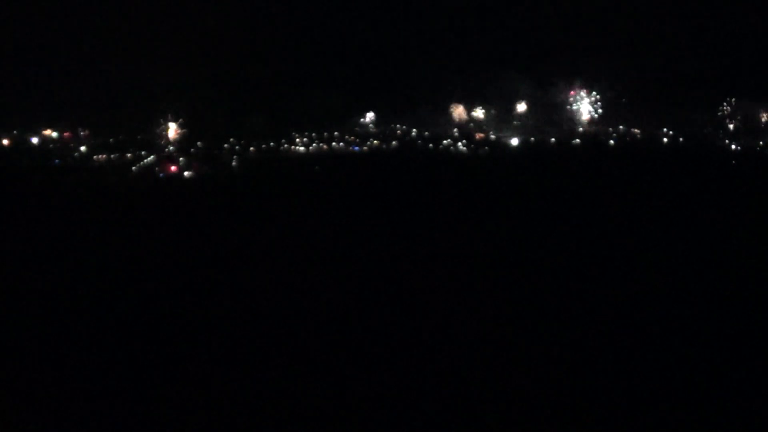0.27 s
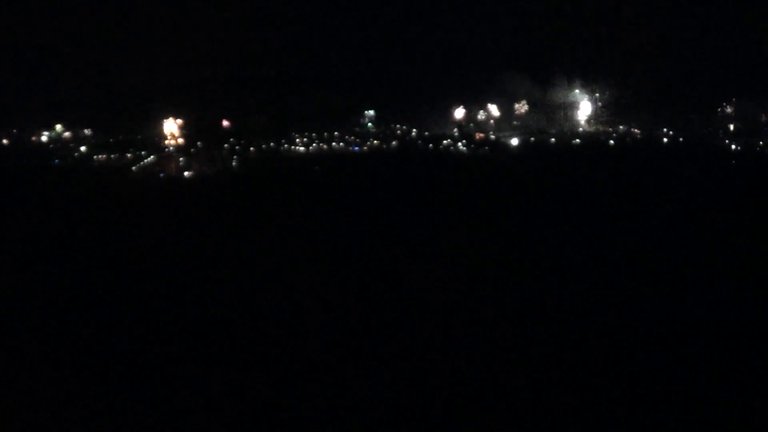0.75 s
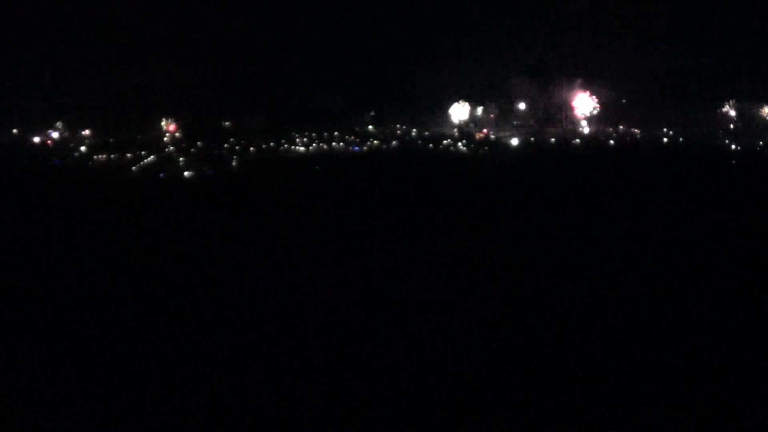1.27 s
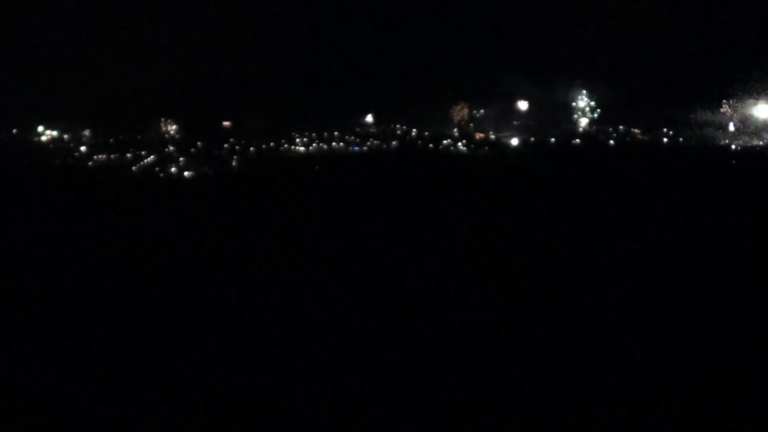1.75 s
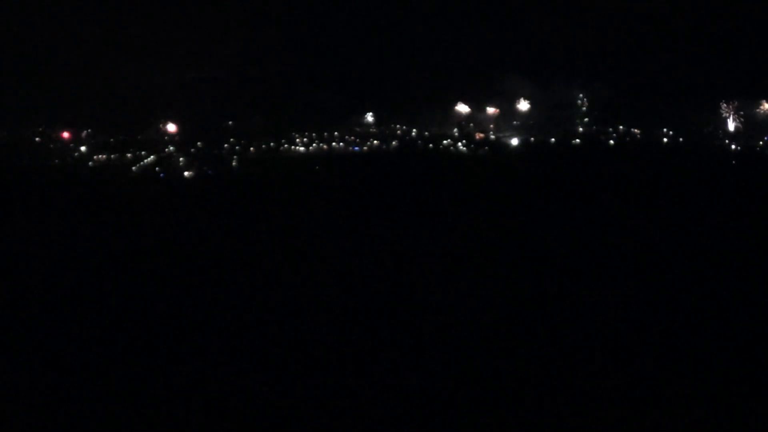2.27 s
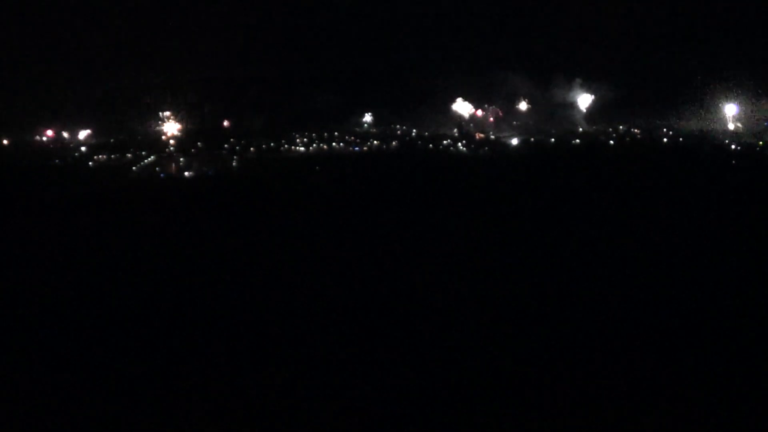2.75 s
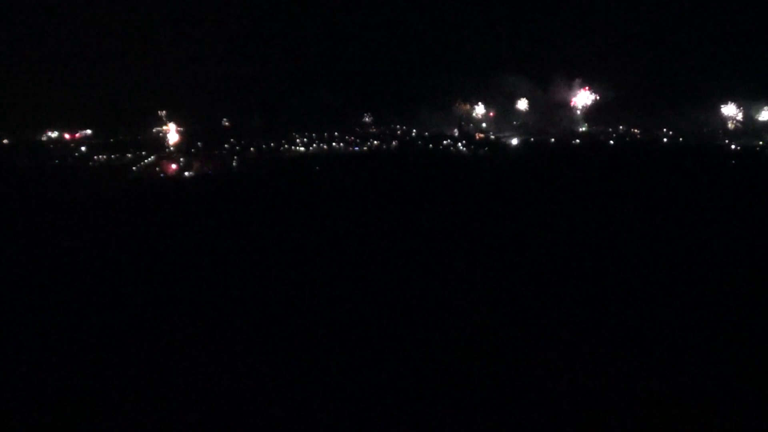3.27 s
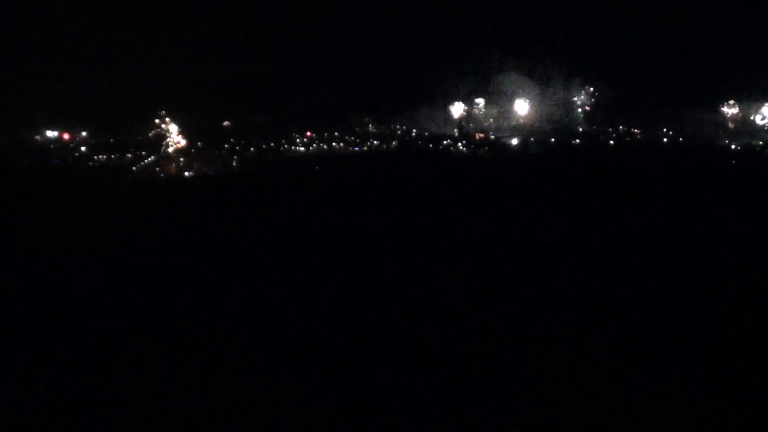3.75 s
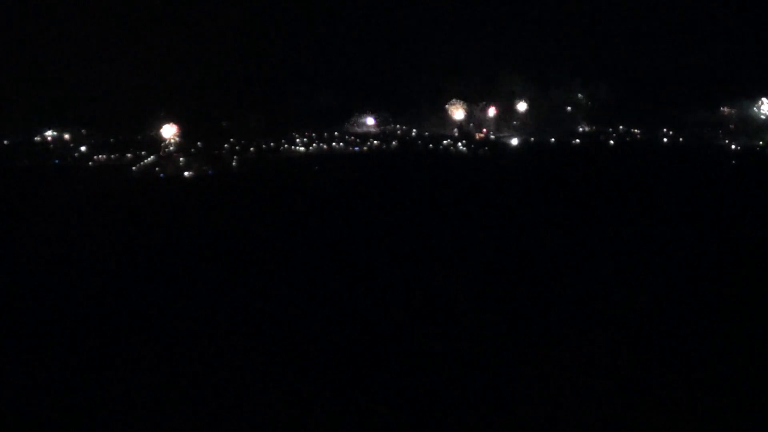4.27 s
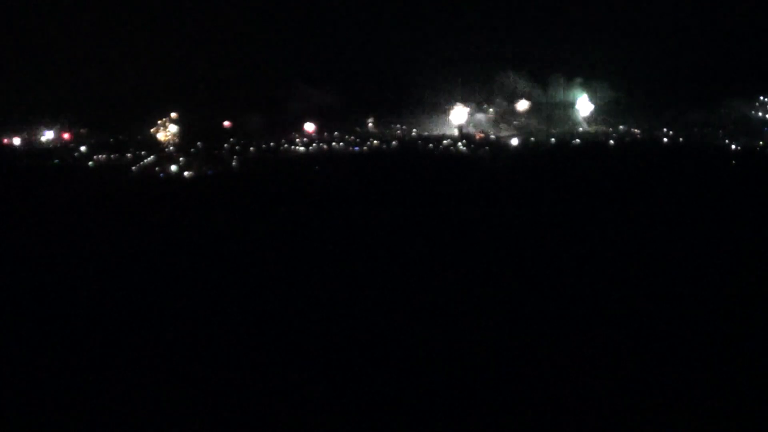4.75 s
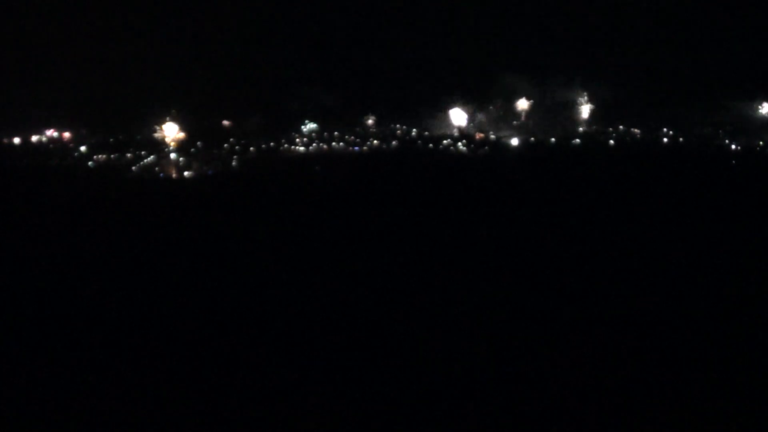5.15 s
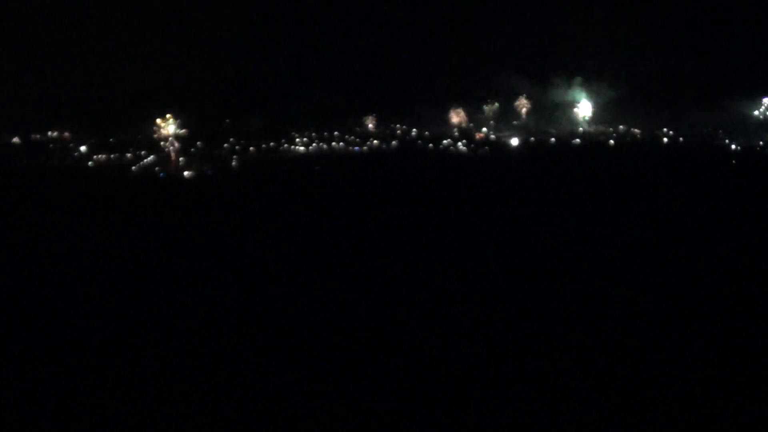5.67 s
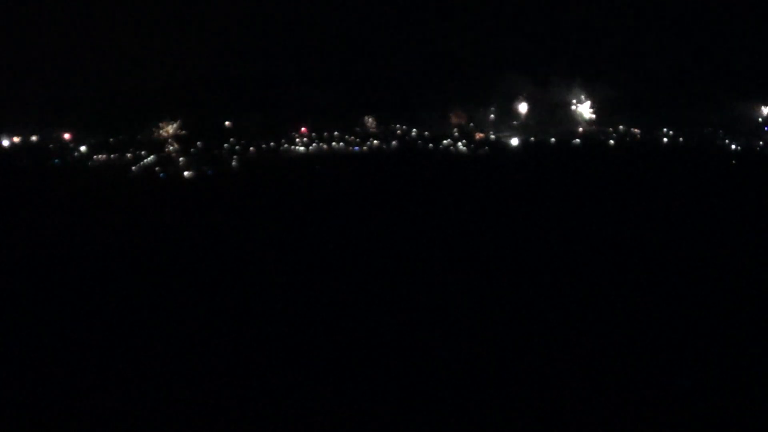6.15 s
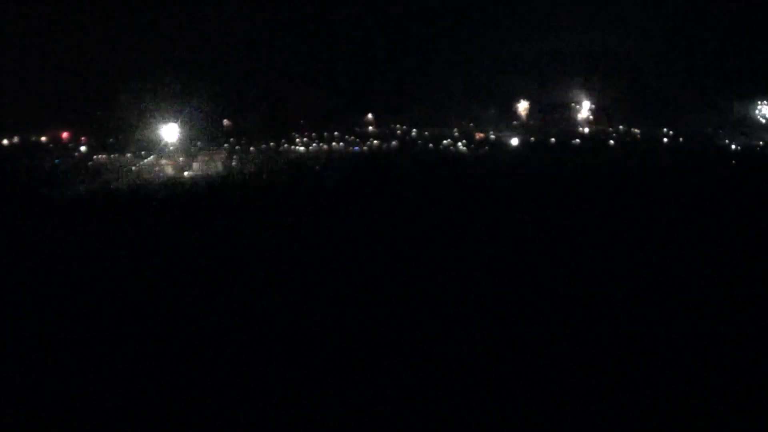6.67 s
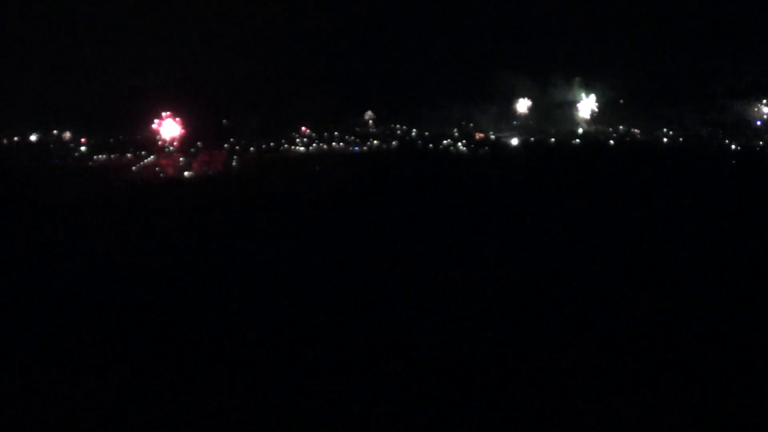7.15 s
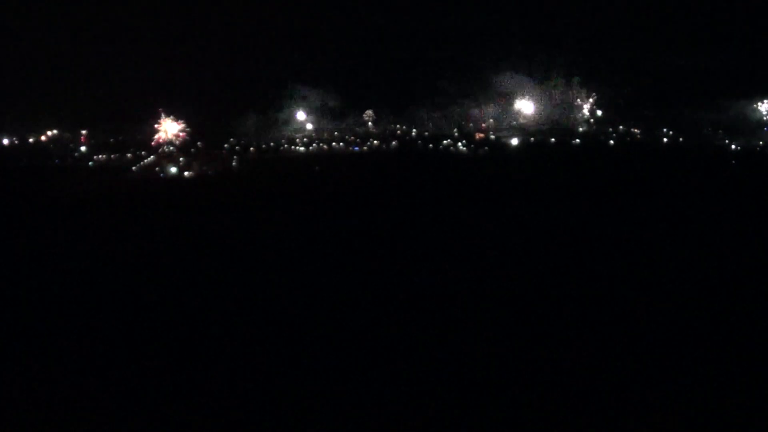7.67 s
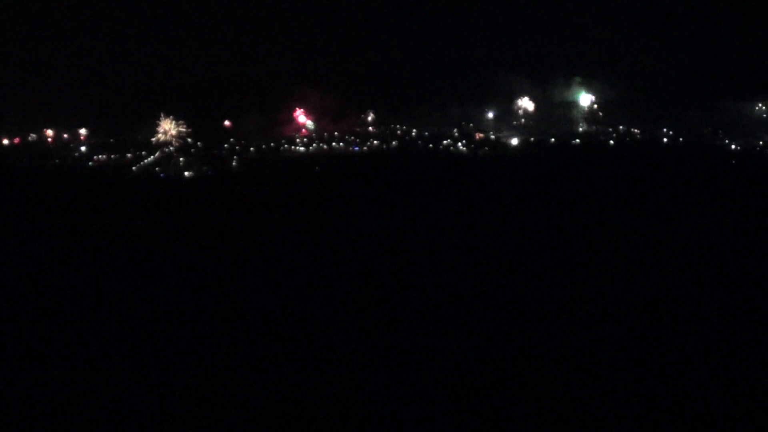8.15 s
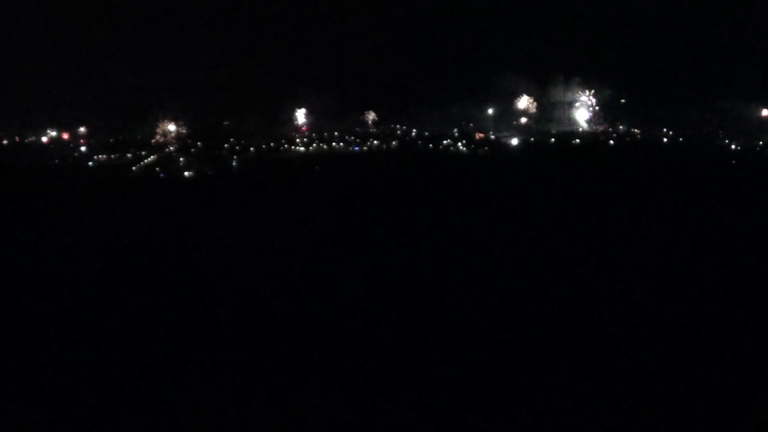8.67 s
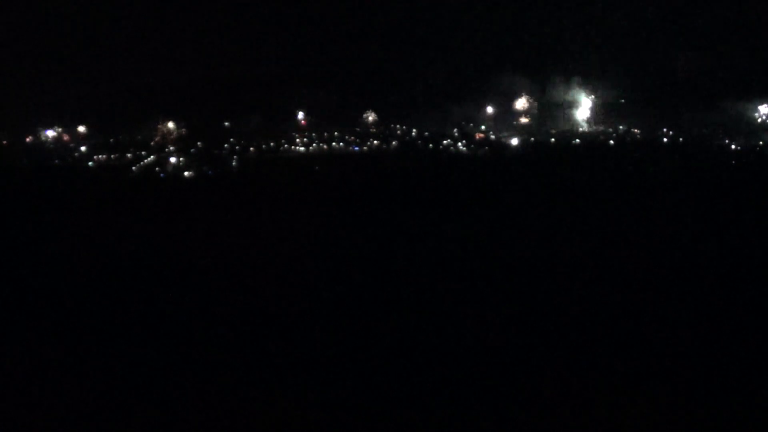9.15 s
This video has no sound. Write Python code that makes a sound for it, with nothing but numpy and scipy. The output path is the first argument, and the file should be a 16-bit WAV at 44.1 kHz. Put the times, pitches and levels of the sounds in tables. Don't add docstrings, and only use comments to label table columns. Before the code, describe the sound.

Dozens of far-off fireworks bursting at once, rapid bangs and snaps piling up over a continuous patter and sizzling crackle outdoors.

```python
import sys
import numpy as np
from scipy import signal
from scipy.fft import rfft, irfft, next_fast_len
from scipy.io import wavfile
from scipy.ndimage import uniform_filter1d

SR = 44100
rng = np.random.default_rng(int(sys.argv[2]) if len(sys.argv) > 2 else 0)


def bounce(signal):
    frames = np.transpose(np.atleast_2d(signal))
    limited = np.clip(frames, -1, 1)
    pcm = np.round(limited * 32767).astype(np.int16)
    wavfile.write(sys.argv[1], SR, pcm)


def volts_from_decibels(level):
    exponent = np.asarray(level, float) / 20
    return 10 ** exponent


N = 414981

# start in seconds, thump level in dB, starting
# pitch in Hz, then crack level in dB if one survives the distance, and its extra steepness in dB.
LEFT_SHELLS = [(.15, 0, 525, -10, -.4), (0.2649, -2, 620, -23, 1.5), (.769, -3, 560, -22),
               (1.1086, -6.5, 427), (0.5521, -4, 529), (1.2652, -5, 470), (1.56, -6.8, 510),
               (1.693, -4.8, 520), (2.3748, 6, 500, -6, -.4), (2.4459, -6, 510), (2.736, -2.5, 470, -24),
               (3.8329, -6.5, 530), (4.1119, -7, 510), (4.4155, -9, 555), (4.7128, -2, 313),
               (5.0264, -8, 423), (5.2297, 2, 477, -4, .4), (6.6806, -4.5, 590), (7.2624, -8, 535),
               (7.874, 0, 563), (8.354, -6.5, 415, -21), (8.8656, 3.5, 443, -5), (8.9053, 2.5, 470, -13.5),
               (9.0489, 2, 557), (9.099, -7, 610, -19, 1.2)]
MID_LEFT_SHELLS = [(0.1977, 1, 493, -8, -.3), (0.2834, -9, 467, -12, 0), (0.3768, 4, 640, -23),
                   (0.595, 3, 590, -15, 1), (0.6462, 2.5, 620, -20, -.5), (0.8885, 2.5, 503, -5.5, .4),
                   (1.0039, -4, 536), (1.1845, 4.5, 460, -6, -1), (1.409, 4, 332, -10, 1),
                   (1.5089, -6, 500), (1.8016, -1, 530), (1.8223, -3.5, 480), (2.6309, -6, 550, -15.5, .2),
                   (3.135, 4, 494, -11, -1), (3.5498, -10, 393), (3.608, -5.5, 425),
                   (3.6569, -6, 570, -18, .3), (3.6704, -6, 493), (4.1712, -8, 480), (4.3548, 2.5, 536, -5),
                   (4.395, -2, 543, -19, .7), (6.1034, 4.5, 543, -10.5), (6.2026, 2.5, 503, -7.5),
                   (7.024, -0.5, 550, -5, -.7), (7.3325, -5, 325, -14, -3), (7.646, -2.5, 355, -16),
                   (7.8879, 1, 395, -13), (7.9739, -5, 610, -16.5), (8.695, -5.5, 340, -22),
                   (9.162, 1.5, 454, -7, .7)]
MID_RIGHT_SHELLS = [(.054, -6, 520, -17, 1), (0.3466, 2, 570, -18, 1), (0.7126, 1, 603),
                    (0.9386, 3, 496, -11), (1.4245, -4.5, 335), (6.1732, -4, 627, -21, .7),
                    (2.041, -3.5, 503, -15), (2.3465, -8, 463), (2.6533, 1.5, 450, -11, -.4),
                    (2.7988, -4, 555, -23, 1.5), (2.822, -5, 630, -34), (3.215, 1, 556, -17, 1.2),
                    (4.0906, 0, 650, -26), (4.2013, 2, 410, -7, 0), (4.3225, -4, 575, -13, .5),
                    (4.5942, 5.5, 500, -19), (5.315, -5.5, 447), (5.3578, 4, 617, -15),
                    (5.654, 3, 420, -9.5), (6.065, 2, 374, -3), (6.6497, -3, 450, -12),
                    (7.0184, 5, 458, -14.5), (7.1342, 1.5, 650, -18.5), (7.3506, 2.5, 660, -14, -1),
                    (7.3887, 5, 620), (7.7536, -9, 600, -17, .5), (7.803, -5.5, 550, -21),
                    (8.2759, 1.5, 455, -14.5), (8.909, -0.5, 443, -0.5), (9.016, 3, 487, -8, .8),
                    (9.342, 1, 424, -11, -.6)]
RIGHT_SHELLS = [(0.03, -9.5, 560), (.1651, -3, 610, -10.5), (0.2145, -3, 660, -14.5), (.273, -7, 485),
                (0.3008, -2, 560, -14), (.7858, -7, 645, -15), (1.3662, -2.5, 650, -14, 1.6),
                (1.63, 2, 410, -9.5), (6.4731, -3, 590, -9), (2.279, -4.5, 546, -10, .2),
                (2.353, -6, 505, -19.5), (2.92, 5, 392, -8, -1.5), (3.9515, -7.5, 517), (3.9553, -4, 475),
                (4.226, 3.5, 430, -7), (4.7255, 1, 590, -11, -.8), (5.1051, -3.5, 510, -11.5, -.7),
                (5.7319, -3, 570, -11.5), (6.4817, -7, 322, -16), (6.672, -1, 474, -9, -.4),
                (6.8589, -5.5, 516, -13.5), (7.6726, 0, 605, -9.5), (7.9684, -9, 530), (9.045, 4, 440, -13)]
NEAR_SALUTES = [(0.2021, -11, 582, -23), (0.3674, -6, 684, -14), (1.197, -8.5, 500, -14.5),
                (1.212, -13, 537, -22, 2), (1.597, -7, 655, -16, 1), (2.7765, -13.5, 620, -27),
                (2.9886, 1.5, 493, -8), (3.2572, -11, 710, -18), (3.5913, -5, 635, -12, -.7),
                (3.6247, -11, 575, -17), (3.9713, -13.5, 640, -18.5), (4.3348, -13, 440, -15),
                (4.5427, -4.5, 590, -9.5, -.2), (6.7412, -8.5, 510, -13), (6.7615, -12, 460, -14),
                (8.346, -9.5, 640, -14, -.8), (8.565, -12, 530, -20, 2), (8.6512, -10.5, 594, -15, 1),
                (8.7689, -2, 586, -7, -.5)]
SITE_PAN_DB = [4.5, -0.8, -1.5, -3, -3.6]
# start in seconds, peak level in dB.
LARGE_POPS = [(0.0786, -10.5), (0.211, -15), (0.4072, -11), (0.4205, -13), (0.539, -14.5), (1.2626, -12),
              (1.4143, -17), (1.665, -15), (2.7964, -9), (2.9331, -8), (3.2123, -9), (3.485, -13),
              (3.6544, -7.5), (4.2142, -13), (5.558, -14), (5.8597, -13), (5.9266, -12), (6.0793, -4.5),
              (6.4105, -13), (6.992, -8.5), (7.9473, -14), (7.963, -8), (9.2377, -16.5), (9.2667, -9)]
MEDIUM_POPS = [(.025, -7), (0.2941, -4), (0.5747, -12.5), (0.9978, -11.5), (1.2531, -10), (1.6357, -6.5),
               (1.8358, -10), (1.8423, -10), (2.521, -10.5), (2.955, -10), (3.052, -8.5), (3.4496, -9),
               (3.5534, -13), (3.8093, -11.5), (3.9209, -13.5), (4.383, -10), (4.7166, -4), (5.0705, -12.5),
               (5.3774, -9.5), (5.8812, -10.5), (6.1806, -6), (6.38, -8), (6.4137, -12), (6.6871, -8.5),
               (6.873, -11.5), (7.74, -14.5), (7.8779, -15), (8.1988, -15.5), (8.987, -10.5)]
SMALL_POPS = [(.507, -11.5), (.581, -16), (.625, -15), (1.14, -16), (5.468, -17.5), (0.772, -15),
              (1.4774, -12), (1.6423, -17), (1.7254, -14), (1.7986, -14), (1.8054, -4.5), (2.11, -17),
              (2.238, -17), (2.3493, -12), (2.476, -17), (2.6846, -14.4), (3.772, -10.5), (4.043, -14.5),
              (4.3473, -7), (5.3191, -16), (5.6365, -11.5), (5.6466, -12), (6.3574, -12.5), (6.7671, -10),
              (7.093, -11), (8.0706, -16), (8.474, -17), (8.488, -16), (8.7343, -11), (8.785, -16)]
TINY_POPS = [(0.4247, -6.5), (.571, -11), (1.007, -10.5), (1.6116, -9.5), (3.7994, -8.5), (6.0217, -10),
             (6.4846, -8), (6.7306, -8.5), (7.03, -5), (8.3584, -13), (8.4618, -13), (8.695, -7),
             (8.8989, 1.5), (8.84, -18), (9.1499, -10.5), (9.3543, -7), (9.3584, -8.5)]
POP_PITCH_HZ = [403, 510, 575, 650]
# start in seconds, peak level in dB.
FIRECRACKER_SNAPS = [(.262, -25), (0.4003, -20), (0.423, -14), (0.9113, -22), (1.014, -17), (1.467, -22),
                     (2.156, -26), (2.748, -21), (3.7995, -22), (3.8233, -26), (4.15, -28), (4.3582, -19),
                     (5.667, -19), (.431, -24), (.741, -30), (.95, -27), (1.381, -30), (2.392, -26),
                     (2.508, -28), (2.62, -27), (2.945, -28), (3.409, -30), (3.485, -25), (4.559, -27),
                     (4.715, -27), (4.776, -30), (5.045, -27), (5.542, -28), (5.549, -28), (6.09, -26),
                     (6.609, -30), (7.186, -29), (7.227, -29), (7.235, -29), (7.251, -28), (8.228, -29),
                     (8.287, -28), (9.037, -24), (5.746, -27), (6.019, -25), (6.0677, -17), (7.69, -26),
                     (8.2641, -25), (8.42, -30), (8.635, -33), (8.883, -24), (9.186, -24), (8.8176, -24)]
# middle in seconds, peak level in dB, heard pitch in Hz.
FAINT_THUMPS = [(.183, -19, 354), (.359, -18, 406), (.402, -16, 378), (.432, -15, 440), (.438, -19, 455),
                (.464, -16, 460), (.514, -18, 487), (.849, -19, 399), (1.015, -18, 533), (1.074, -22, 439),
                (1.153, -17, 388), (1.225, -16, 385), (1.232, -20, 496), (1.384, -19, 450),
                (1.468, -15, 493), (1.744, -21, 414), (2.391, -17, 442), (2.562, -19, 530),
                (2.603, -22, 401), (2.62, -18, 477), (2.648, -18, 336), (2.666, -18, 367),
                (2.789, -15, 470), (3.04, -17, 407), (3.268, -19, 548), (3.349, -19, 316),
                (3.379, -21, 420), (3.508, -18, 481), (3.712, -19, 356), (3.982, -20, 492),
                (4.239, -17, 438), (4.253, -21, 385), (4.374, -20, 403), (4.561, -17, 497),
                (4.68, -17, 501), (4.69, -17, 359), (4.777, -21, 406), (5.121, -19, 440), (5.668, -16, 325),
                (6.43, -18, 468), (6.665, -16, 450), (6.758, -18, 396), (6.808, -18, 399),
                (6.969, -17, 424), (7.057, -18, 461), (7.229, -21, 459), (7.285, -20, 508),
                (7.416, -19, 394), (7.691, -19, 458), (8.111, -20, 535), (8.365, -18, 339),
                (8.53, -23, 372), (8.663, -19, 440), (8.674, -17, 382), (8.948, -17, 447),
                (9.113, -19, 359), (9.138, -18, 412), (9.234, -20, 395)]
# middle in seconds, peak level in dB, pitch in Hz.
RINGING_PIPS = [(.056, -24, 1300), (.157, -29, 1500), (.787, -26, 1650), (2.35, -30, 1600),
                (7.334, -28, 1600), (.507, -32, 1300), (1.008, -28, 1500), (2.096, -32, 1720),
                (2.618, -32, 1550), (2.778, -28, 1700), (2.799, -29, 1700), (3.487, -30, 1460),
                (3.506, -32, 1450), (4.182, -30, 1450), (4.656, -32, 1660), (4.679, -31, 1520),
                (4.714, -30, 1450), (4.948, -33, 1580), (5.04, -30, 1540), (5.122, -30, 1450),
                (6.169, -32, 1640), (6.489, -28, 1575), (6.731, -29, 1440), (7.045, -32, 1820),
                (7.878, -31, 1365), (7.956, -34, 1455), (8.026, -34, 1540), (8.117, -31, 1530),
                (8.935, -32, 1560)]
# frequency in Hz, time to fall 60 dB in seconds.
TOWN_DECAY = [(150, 0.18), (500, 0.57), (1500, 0.5), (5000, 0.2)]
# time in seconds, level in dB.
FAR_SWELL = [
    (0, -31.5),
    (2.0, -33.5),
    (4.5, -32.5),
    (4.9, -35.5),
    (5.5, -34),
    (6.3, -33.5),
    (8.15, -33),
    (9.1, -32.5),
]
# frequency in Hz, level in dB per Hz.
STAR_SPECTRUM = [(600, -18), (900, -2), (1300, 4), (1670, 5.5), (2200, 1), (2750, -5), (3400, -19),
                 (6000, -49)]
# fullest moment in seconds, level in dB, flare-up time constant in
# seconds, burn-out time constant in seconds.
STAR_SHOWERS = [(.01, -49.5, .1, 0.24), (.75, -48.5, 0.16, 0.031), (.96, -45.5, .04, .25),
                (1.46, -51, 0.067, 0.15), (2.11, -46, 0.086, 0.14), (2.48, -48, .08, 0.14),
                (2.75, -46.5, 0.16, 0.1), (2.98, -49.5, 0.072, 0.072), (3.47, -43.5, 0.086, .07),
                (3.78, -48, 0.19, 0.11), (4.72, -42.5, 0.16, 0.079), (5.05, -47.5, 0.28, .06),
                (5.32, -46.5, 0.082, 0.28), (6.14, -46, .1, 0.27), (7.08, -49, .15, .15),
                (7.5, -47.5, .12, .3), (8.12, -48.5, 0.11, 0.13), (8.92, -47, 0.1, 0.26),
                (9.2, -44, 0.29, .3)]
SHOWER_TREBLE_DB = [2, 0, 3, 2, 1, 3, 1, 1, -1, 0, -1, -2, 1, 3, 5, 2, 1, 0, 5]
# frequency in Hz, gain in dB.
AIR_PATH = [(3000, 0.5), (5000, 1.5), (7000, -11), (16000, -62)]
# frequency in Hz, left-right difference in dB.
PORT_LEVEL = [(60, -6), (180, -7), (550, 0), (1650, 0.5), (4970, 3.5), (15000, 3)]
# frequency in Hz, lead of the left port in radians.
PORT_PHASE = [(0, 0.054), (260, 0.67), (2330, 0.3), (16500, -0.0)]
# frequency in Hz, level in dB per Hz.
HISS_SPECTRUM = [(3000, -4.5), (8000, -7.5), (15000, -9.5)]
# time in seconds, peak level in dB.
OVERLOAD_TICKS = [
    (6.065, -21),
    (9.1616, -20.5),
]

CRACK_LAG_S, CRACK_SIDE = 0.00018, 0.15
STEEP_PER_DB, SNAP_STEEP_DB = 0.16, -0.3
SCATTER_COPIES = 41
TREBLE_HZ = 2400


def evened(x):
    return x / np.sqrt(np.mean(x ** 2) + 1e-20)


def read(points, hz):
    f, value = np.transpose(points)
    return np.interp(np.log(hz + 1), np.log(f + 1), value)


def shaped(x, response):
    size = next_fast_len(N)
    gain = response(np.fft.rfftfreq(size, 1 / SR))
    return irfft(rfft(x, size) * gain, size)[..., :N]


def add(mix, s, sound, pan_db):
    part = mix[:, max(round(s * SR), 0):][:, :sound.shape[-1]]
    gains = volts_from_decibels([[pan_db / 2], [-pan_db / 2]])
    part += (gains * sound)[:, :part.shape[1]]


def bursts():
    mix = np.zeros((2, N))
    fronts = [(s, db, 0, SNAP_STEEP_DB - STEEP_PER_DB * (db + 10)) for s, db in FIRECRACKER_SNAPS]
    sites = (LEFT_SHELLS, MID_LEFT_SHELLS, MID_RIGHT_SHELLS, RIGHT_SHELLS, NEAR_SALUTES)
    for site, pan_db in zip(sites, SITE_PAN_DB):
        for s, db, hz, *shock in site:
            add(mix, s, boom(db, hz, pan_db), 0)
            if shock:
                crack_db, *steep_db = shock
                fronts.append((s + CRACK_LAG_S, crack_db, CRACK_SIDE * pan_db, sum(steep_db)))
    for pops, hz in zip((LARGE_POPS, MEDIUM_POPS, SMALL_POPS, TINY_POPS), POP_PITCH_HZ):
        sides = rng.standard_normal(len(pops))
        for (s, db), side in zip(pops, sides):
            add(mix, s, boom(db, hz, 3 * side), 0)
    ground = signal.butter(2, 85, "high", fs=SR, output="sos")
    return front(lulls(signal.sosfilt(ground, mix)), fronts)


def boom(db, hz, pan_db):
    out = np.zeros((2, SR // 8))
    add(out, 0, volts_from_decibels(db) * thump(hz), pan_db)
    slap_db, slap_s, slap_lift = -14.5, 0.012, 1.116
    for wait, sign, side in rng.random((5, 3)):
        slap = thump(hz * slap_lift * volts_from_decibels(2.2 * sign)) * np.sign(sign - 0.5) * np.exp(-2 * wait)
        add(out, 2 * slap_s * wait + 0.00197, volts_from_decibels(db + slap_db) * slap, pan_db + 8 * (side - 0.5))
    return out


def thump(hz, sag=0.36, centre=0.82, width=0.62):
    t = np.arange(SR // 50) / SR
    turns = np.log(1 + sag * hz * t) / sag
    swell = np.exp(-((turns - centre) / width) ** 2)
    rise = 1 - np.exp(-(turns / 0.16) ** 3)
    return np.sin(2 * np.pi * turns) * swell * rise


def front(mix, rows):
    out = np.zeros_like(mix)
    chances = rng.standard_normal((len(rows), SCATTER_COPIES + 3))
    for (s, db, pan_db, steep_db), (side, sharp, ring, *scatter) in zip(rows, chances):
        hz = 2100 * volts_from_decibels(STEEP_PER_DB * (db + 10) + 0.15 * sharp + steep_db)
        shock = crack(hz, ring, np.array(scatter))
        add(out, s - 1 / 500, volts_from_decibels(db) * shock, pan_db + 1.2 * side)
    return mix + out


def crack(hz, ring, scatter, width=0.35, scatter_db=-17, scatter_s=0.0047,
          ring_hz=1450, ring_db=-12.5, ring_s=0.0017):
    t = (np.arange(SR // 70) - SR // 500) / SR
    swing = 1.546 * np.sin(2 * np.pi * hz * t) * np.exp(-abs(hz * t) / width)
    tone = np.sin(2 * np.pi * ring_hz * volts_from_decibels(1.49 * ring) * t)
    swing += volts_from_decibels(ring_db) * tone * np.exp(-t / ring_s) * (t > 0)
    copies = np.zeros(SR // 100)
    fade = np.exp(-np.arange(len(scatter)) / 4000 / scatter_s)
    copies[::SR // 4000] = volts_from_decibels(scatter_db) * scatter * fade
    copies[0] = 1
    blur = signal.windows.gaussian(41, 2.0 * (2500 / hz) ** 2)
    rounded = np.convolve(swing, blur / blur.sum(), "same")
    return np.convolve(rounded, copies)


def lulls(mix):
    out = np.zeros_like(mix)
    sag = 1.25
    sides = rng.standard_normal(len(FAINT_THUMPS))
    for (s, db, hz), side in zip(FAINT_THUMPS, sides):
        add(out, s - 1 / hz / sag, volts_from_decibels(db) * thump(sag * hz), 2.5 * side)
    t = np.arange(-SR // 200, SR // 200) / SR
    swell = np.exp(-(t / 0.0012) ** 2)
    for s, db, hz in RINGING_PIPS:
        add(out, s - 1 / 200, volts_from_decibels(db) * np.sin(2 * np.pi * hz * t) * swell, 0)
    return mix + out


def town(x):
    taps = np.zeros((2, SR // 2))
    jitter = rng.integers(0, 60, (2, (SR // 2 - 301) // 60))
    at = np.arange(300, SR // 2 - 60, 60) + jitter
    np.put_along_axis(taps, at, rng.standard_normal(at.shape), 1)
    taps[1] = 0.73 * taps[0] + 0.5 * taps[1]
    hz, t, z = signal.stft(taps, SR, nperseg=256)
    decay = volts_from_decibels(-60 * t / read(TOWN_DECAY, hz)[:, None])
    tail = signal.istft(z * decay, SR, nperseg=256)[1]
    tail = tail / np.linalg.norm(tail[0])
    return signal.fftconvolve(x.mean(0)[None], tail, axes=1)[:, :N]


def barrage():
    t = np.arange(N) / SR
    far = patter([thump(hz) for hz in np.geomspace(335, 900, num=10)], 400, 1.76, 10.4)
    far = signal.sosfilt(signal.butter(2, 195, "high", fs=SR, output="sos"), far)
    far_level = volts_from_decibels(-1.4 + np.interp(t, *np.transpose(FAR_SWELL)))
    fade = np.exp(-np.arange(SR // 200) / SR / 0.0018)
    snaps = rng.standard_normal((6, SR // 200)) * fade
    stars = patter(snaps, 900, 1.8, 2) + 0.28 * rng.standard_normal((2, N))
    stars = evened(shaped(stars, lambda hz: volts_from_decibels(read(STAR_SPECTRUM, hz))))
    treble = shaped(stars, lambda hz: 1 / (1 + (TREBLE_HZ / (hz + 1)) ** 10))
    crackle = showers(t, np.zeros(len(STAR_SHOWERS))) * (stars - treble)
    crackle = crackle + showers(t, SHOWER_TREBLE_DB) * treble
    return far_level * far + volts_from_decibels(2.0) * crackle


def patter(shapes, per_s, spread_db, pan_db):
    size = volts_from_decibels(spread_db * np.minimum(rng.exponential(1, N), 2.4))
    size = size * (rng.random(N) < per_s / SR)
    kind = rng.integers(0, len(shapes), N)
    sides = rng.permutation(np.linspace(-1, 1, len(shapes)))
    mix = np.zeros((2, N))
    for k, (shape, side) in enumerate(zip(shapes, sides)):
        add(mix, 0, signal.oaconvolve(size * (kind == k), shape)[:N], side * pan_db)
    return evened(mix)


def showers(t, more_db):
    power = volts_from_decibels(2 * -59)
    for (s, db, up_s, out_s), extra_db in zip(STAR_SHOWERS, more_db):
        away = np.where(t < s, (s - t) / up_s, (t - s) / out_s)
        power = power + volts_from_decibels(2 * (db + extra_db)) * np.exp(-2 * away)
    return np.sqrt(power)


def scene():
    near = bursts()
    mix = near + volts_from_decibels(-19) * town(near) + barrage()
    return shaped(mix, lambda hz: volts_from_decibels(read(AIR_PATH, hz)))


def ports(dry):
    sides = np.array([[0.5], [-0.5]])
    return shaped(dry, lambda hz: volts_from_decibels(sides * read(PORT_LEVEL, hz)) * np.exp(1j * sides * read(PORT_PHASE, hz)))


def camera_noise():
    t = np.arange(N) / SR
    left, other = rng.standard_normal((2, N))
    other = signal.sosfilt(signal.butter(2, 7000, fs=SR, output="sos"), other)
    both = np.array([left, left + 0.92 * other])
    hiss = evened(shaped(both, lambda hz: volts_from_decibels(read(HISS_SPECTRUM, hz)) * (hz < 15800)))
    hiss_db = -59.5 + 2.2 * (np.arange(N) < 0.15 * SR)
    return volts_from_decibels(hiss_db) * hiss + volts_from_decibels(-68.5) * np.sin(2 * np.pi * 15625 * t)


def limiter(x):
    ceiling_db, release_s = -4.5, 0.014
    over_db = np.maximum(20 * np.log10(abs(x).max(0) + 1e-9) - ceiling_db, 1e-3)
    release = np.arange(N) / SR / release_s
    held_db = np.exp(np.maximum.accumulate(np.log(over_db) + release) - release)
    ahead_db = uniform_filter1d(held_db, size=61, origin=-25)
    return x / volts_from_decibels(ahead_db)


def low_pass(x):
    return signal.sosfilt(signal.butter(12, 16960, fs=SR, output="sos"), x)


def record(dry):
    x = limiter(ports(dry) + camera_noise())
    x = signal.sosfilt(signal.butter(1, 85, "high", fs=SR, output="sos"), x)
    for s, db in OVERLOAD_TICKS:
        add(x, s, -volts_from_decibels(db) * signal.firwin(31, 13000, fs=SR), 0)
    return low_pass(x)


dry = scene()
out = record(dry)
bounce(out)
```